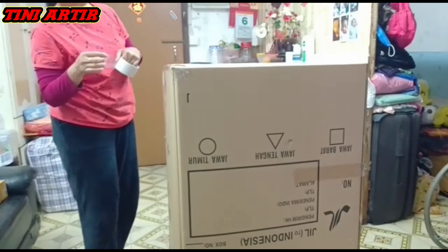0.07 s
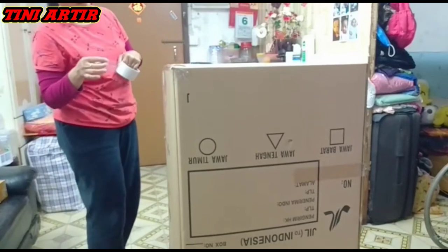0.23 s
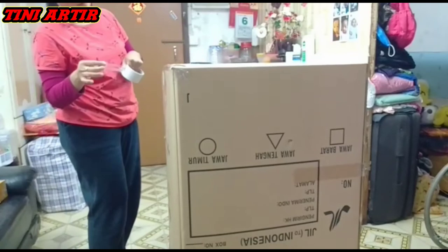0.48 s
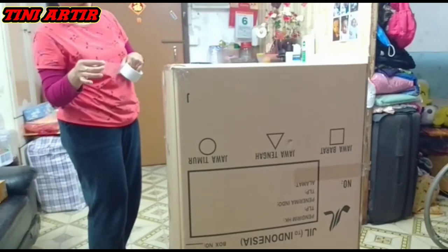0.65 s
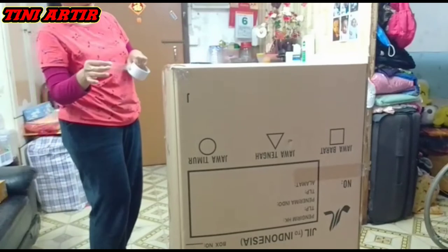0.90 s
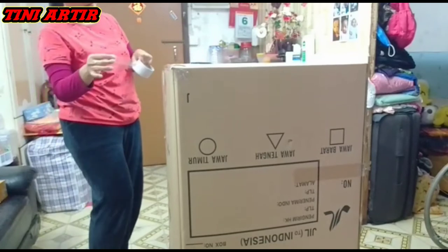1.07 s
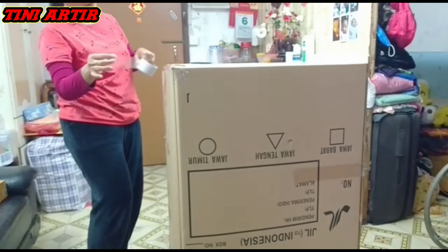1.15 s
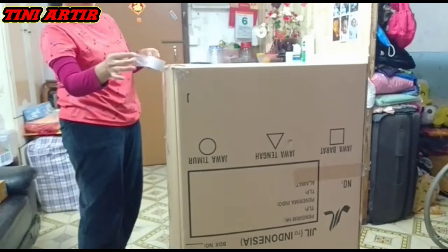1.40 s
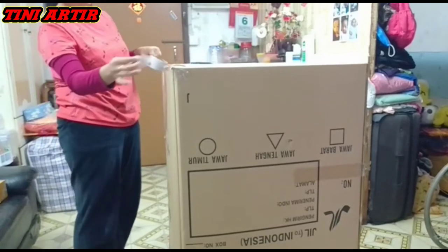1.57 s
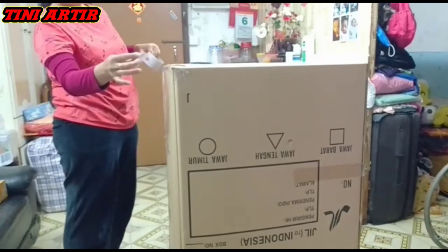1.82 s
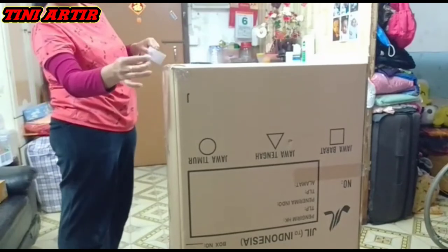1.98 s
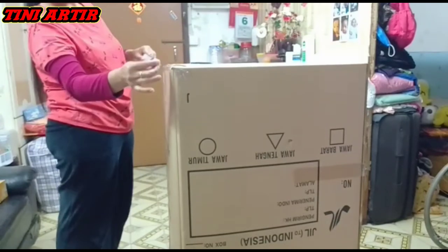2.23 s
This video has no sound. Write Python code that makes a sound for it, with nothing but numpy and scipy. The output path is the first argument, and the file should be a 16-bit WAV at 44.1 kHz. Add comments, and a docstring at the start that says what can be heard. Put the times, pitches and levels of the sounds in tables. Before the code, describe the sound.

Sticky tape is tugged off its roll in quick, crackling strokes indoors.

```python
"""Short tugs of packing tape crackle off a hand-held roll, mixed with four longer pulls.
The glue lets go in quick irregular slips; each cracks the taut film, sets it zinging,
thumps the roll and rings its cardboard core. The sound arrives from the left, glances off
nearby surfaces and fills a small, hard-walled room. Faint handling rustles and a thin hiss
of creeping tape lie over a murmur of air."""
import sys
import numpy as np
from scipy import signal
from scipy.fft import rfft, irfft, next_fast_len
from scipy.io import wavfile
from scipy.ndimage import uniform_filter1d

SR = 44100
rng = np.random.default_rng(int(sys.argv[2]) if len(sys.argv) > 2 else 0)


def dump(signal):
    """Clip the signal to [-1, 1] and save it as 16-bit WAV at the path in sys.argv[1]."""
    limited = np.clip(np.atleast_2d(signal).T, -1, 1)
    pcm = np.round(limited * 32767).astype(np.int16)
    wavfile.write(sys.argv[1], SR, pcm)


N = 99225

# Short tugs: start_s, length_s, level_db, body_db, core_db, zing_db (last three re level_db)
TUG_EVENTS = [(0.0, 0.0032, -40.5, -25, -7, -19), (0.0474, 0.015, -32, -31.5, -6, -4.5),
              (0.103, 0.0014, -33.5, -33, -17, -5.5), (0.1756, 0.0025, -35, -31, -7.5, -6),
              (0.209, 0.0076, -36.5, -25, -1.5, -6), (0.218, 0.005, -30.5, -22.5, -3.5, -2.5),
              (0.3302, 0.014, -33.5, -20.5, -5, 5.5), (0.5916, .003, -31, -26, -32, -5.5),
              (0.6606, 0.0028, -31, -32.5, -16, -3), (0.688, 0.0079, -32.5, -20, -2.5, -1),
              (0.703, 0.0074, -30.5, -17, -2, -3), (0.737, 0.016, -28, -12.5, 0.5, -6),
              (0.8334, 0.0062, -31, -15, -5, -6), (0.986, 0.0018, -29, -20, -6, 1.5),
              (1.133, .002, -36.5, -8, -11, 7), (1.5161, 0.0039, -30.5, -10.5, -13.5, -6),
              (1.65, .005, -33.5, -27.5, -6.5, 6.5), (1.891, 0.0039, -33.5, -13.5, -16, -3.5),
              (1.913, .004, -30.5, -16.5, -5.5, -2.5), (1.935, 0.0063, -32, -13.5, -16.5, 0),
              (1.955, 0.0033, -33, -19.5, -11, 8)]
TUG_GAP_S, TUG_FADE_DB, TUG_TRIM_DB = 0.0011, 8, -5
GAP_LOG_SPREAD, SLIP_SPREAD_DB, SLIP_DECAY_S = 0.45, 2.5, 0.00052
# Spectrum of the film's crack: freq_hz, gain_db
CRACK_SPECTRUM = [(100, -44.5), (350, -30), (520, -15.5), (700, -6), (1100, 0), (1500, -2.5), (2000, 3.5),
                  (2900, 2.5), (3600, -2.5), (4500, -6.5), (5600, -8), (7200, -7), (8200, -17.5),
                  (10000, -23), (12500, -31), (15000, -26.5), (16000, -25)]
# Spectrum of the roll's thump: freq_hz, gain_db
BODY_SPECTRUM = [(25, -37.5), (60, -29), (110, -12), (170, -17), (240, -11), (290, -3), (360, 1),
                 (425, -4.5), (540, 0.5), (700, -21.5), (1500, -27.5)]
# Spectrum of the taut strip's zing: freq_hz, gain_db
ZING_SPECTRUM = [(2000, -33.5), (5000, -11.5), (5900, -4.5), (6650, -0.5), (7300, -9), (8300, -19),
                 (12000, -28.5)]
CRACK_DB, BODY_DB, ZING_DB, CORE_DB = 4.5, 4, 2.5, -1
# Cardboard core modes, before the grip shifts them: pitch_hz, width_hz, level_db
CORE_MODES = [(703.6, 27, 4), (747.6, 38, -3.5), (806, 73, -9), (931, 66, -3), (983, 55, -12.5),
              (1217, 50, -17)]
# Lowest core mode as the grip changes: time_s, pitch_hz
GRIP_PITCH = [(.17, 719), (.23, 806), (.33, 725), (.41, 728.6), (1.15, 694.5), (1.52, 659), (1.65, 665)]
# Knocks on the core as the tape breaks loose: time_s, level_db
CORE_KNOCKS = [(.331, -38.5), (.593, -46), (.6595, -45), (.836, -38.5), (1.517, -31)]
CORE_CUTOFF_HZ, CORE_DIRECT_DB, CORE_ROOM_DB = 683, 4.5, -3.5  # ring sounds close and dry
DIRECT_DB, DIRECT_LEAD_S, DIRECT_PAN_DB = -9, 0.00015, 2.4
# Early reflections: delay_s, level_db, left_lead_s, left_pan_db, highpass_hz
REFLECTIONS = [(.00335, -2, 0.0054, 0, 3200), (.0042, -9.5, -.00005, 3.5, 1500),
               (.0075, -13.5, -0.017, -1.5, 400)]
# Room decay: freq_hz, t60_s
ROOM_DECAY = [(100, 0.18), (500, 0.18), (1000, 0.26), (2800, 0.26), (7000, 0.24)]
# Likeness of left and right in the room: freq_hz, correlation
ROOM_CORRELATION = [(100, 0.5), (350, 0.75), (750, 0.43), (1300, .15), (2200, 0.0098), (5000, 0.13)]
# Reverb balance: freq_hz, left_pan_db
ROOM_BALANCE = [(200, -0.6), (700, 2), (1300, 0.3), (2500, 1.2), (6000, 2), (9000, -1), (15000, -1.5)]
ROOM_DB, ROOM_DELAY_S, ROOM_BUILD_S = -5.5, 0.0044, 0.0051
MOVE_STEP_S, DELAY_LOG_SPREAD = 0.2, 0.0627
# Spectrum of the room's air: freq_hz, gain_db
AIR_SPECTRUM = [(25, -1.5), (80, -2.5), (120, 1.5), (200, -7), (1500, -13.5), (4000, -17), (6500, -11),
                (9000, -26), (16000, -36.5)]
AIR_DB, LOWPASS_HZ = -77, 15750
# Long pulls, one list each: time_s, level_db, body_db, core_db, zing_db (last three re level_db)
PULL_ENVELOPES = [
    [(.332, -35, -16.5, 4.5, -8.5), (.355, -33.5, -14, -0.5, -5), (.378, -33, -12, 6.5, 2.5),
     (.412, -31, -18.5, 6, -4.5), (.44, -34.5, -10, -10, -4.5)],
    [(.836, -33, -13, -2, 3.5), (.86, -28, -8.5, -1.5, -9), (.898, -29, -16, -0.5, -2),
     (.955, -31.5, -11.5, -3, -14), (.975, -45.5, -15, -12, -17.5), (1.055, -39, -10.5, 0.5, -3.5),
     (1.08, -34.5, -13.5, -5, 0.5), (1.135, -39, -13.5, 0.5, -3.5), (1.178, -39, -9.5, -12, -8.5)],
    [(1.517, -30.5, -15, -9.5, -9), (1.545, -33.5, -9, -5, -5.5), (1.6, -34.5, -10.5, -6, 0.5),
     (1.632, -34, -10.5, -1.5, -8), (1.657, -48, -12, -11.5, -9)],
    [(1.892, -42, -1, -3.5, -6), (1.908, -42, -19.5, 1, -2.5), (1.955, -44.5, -14, -3.5, 0),
     (1.98, -49, -9.5, -5.5, -6)],
]
PULL_SLIPS_PER_S, PULL_ATTACK_S, PULL_RELEASE_S = 480, 0.00089, 0.0039
# Handling rustles and (second row) tape creep: start_s, length_s, level_db, centre_hz, width_oct
RUSTLES_AND_CREEP = [(1.293, 0.1, -68.5, 2340, 0.42), (1.416, 0.13, -80, 6530, 0.14),
                     (2.149, 0.075, -72, 725, 0.61)]
GRAIN_DB = 2


def amp(db):
    """Decibels to gain."""
    return 10 ** (np.asarray(db) / 20)


def unit_rms(x):
    """Scale to rms 1."""
    return x / np.sqrt(np.mean(np.abs(x) ** 2) + 1e-20)


def curve_at(points, hz):
    """Interpolate (freq_hz, value) points on a log axis."""
    point_hz, values = np.transpose(points)
    return np.interp(np.log(hz + 1), np.log(point_hz + 1), values)


def grid_hz():
    """Filter frequency grid."""
    return np.fft.rfftfreq(2 * next_fast_len(N), 1 / SR)


def filtered(x, response):
    """Apply a response given on the grid."""
    return irfft(rfft(x, 2 * next_fast_len(N)) * response)[..., :N]


def minimum_phase(spectrum):
    """Unit-power response that rings only after the blow."""
    cepstrum = irfft(np.log(amp(curve_at(spectrum, grid_hz()))))
    half = len(cepstrum) // 2
    cepstrum[1:half] *= 2
    cepstrum[half + 1:] = 0
    return unit_rms(np.exp(rfft(cepstrum)))


def tugs():
    """Each tug spreads its energy over a fading run of slips. Rows: crack, body, core, zing."""
    drive = np.zeros((4, N))
    for start_s, length_s, level_db, *parts_db in TUG_EVENTS:
        gap_draw, size_draw = rng.standard_normal((32, 2)).T
        gaps_s = TUG_GAP_S * np.exp(GAP_LOG_SPREAD * gap_draw)
        age_s = np.cumsum(gaps_s) - gaps_s[0]
        fade_db = TUG_FADE_DB * np.minimum(age_s / length_s, 1)
        sizes = (age_s <= length_s) * amp(SLIP_SPREAD_DB * size_draw - fade_db)
        sizes *= np.sqrt(SR / 100) / np.linalg.norm(sizes)  # energy of 10 ms at rms 1
        train = np.bincount(((start_s + age_s) * SR).astype(int), sizes, N)[:N]
        drive += amp(TUG_TRIM_DB + level_db + np.array([0, *parts_db]))[:, None] * train
    return drive


def glue_slips(drive):
    """Each slip is a tiny noise burst of snapping glue threads."""
    pole = np.exp(-1 / (SLIP_DECAY_S * SR))
    power = signal.lfilter([1 - pole], [1, -pole], drive ** 2)
    return np.sqrt(power) * np.sign(rng.standard_normal((4, N)))


def film_crackle(crack, body, zing):
    """Slips crack the film, thump the roll and set the taut strip zinging."""
    return (amp(CRACK_DB) * filtered(crack, minimum_phase(CRACK_SPECTRUM))
            + amp(BODY_DB) * filtered(body, minimum_phase(BODY_SPECTRUM))
            + amp(ZING_DB) * filtered(zing, minimum_phase(ZING_SPECTRUM)))


def core_ring(slips):
    """Slips and knocks ring the cardboard core; its modes shift together with the grip."""
    t, hz = np.arange(N) / SR, grid_hz()
    knock_s, knock_db = np.transpose(CORE_KNOCKS)
    drive = slips + np.bincount((knock_s * SR).astype(int), amp(knock_db), N) * np.sqrt(SR / 100)
    lowest_hz = np.interp(t, *np.transpose(GRIP_PITCH))
    warped_s = np.cumsum(lowest_hz) / CORE_MODES[0][0] / SR
    ring, power = 0, 0
    for pitch_hz, width_hz, level_db in CORE_MODES:
        phasor = np.exp(2j * np.pi * pitch_hz * warped_s)
        pole = np.exp(-np.pi * width_hz / SR)
        envelope = signal.lfilter([1 - pole], [1, -pole], drive / phasor)
        ring += amp(level_db) * (phasor * envelope).real
        power += amp(level_db) ** 2 * (1 - pole) / (1 + pole) / 2
    # A small core radiates little bass.
    radiation = (hz ** 2 / (CORE_CUTOFF_HZ ** 2 - hz ** 2 + 1j * hz * CORE_CUTOFF_HZ)) ** 2
    return amp(CORE_DB) * filtered(ring / np.sqrt(power), radiation)


def sound_path(hz, delay_s, level_db, lead_s, pan_db):
    """Stereo response of one path; positive lead and pan favour the left."""
    side = np.array([[1], [-1]])
    return amp(level_db + side * pan_db) * np.exp(-2j * np.pi * hz * (delay_s - side * lead_s / 2))


def diffuse(spectra, hz):
    """Mix two unrelated spectra into a room field: alike in the bass, barely so in the treble."""
    angle_rad = np.arccos(curve_at(ROOM_CORRELATION, hz)) / 2
    mid, side = spectra * np.array([np.cos(angle_rad), np.sin(angle_rad)])
    return np.array([mid + side, mid - side])


def echoes():
    """Room impulse response for one roll position: glancing reflections, then a short reverb."""
    band_hz, frame_s, noise = signal.stft(rng.standard_normal((2, SR // 2)), SR, nperseg=256)
    decay = amp(-60 * frame_s / curve_at(ROOM_DECAY, band_hz)[:, None])
    _, tail = signal.istft(noise * decay, SR, nperseg=256)
    age_s = np.maximum(np.arange(tail.shape[1]) / SR - ROOM_DELAY_S, 0)
    tail *= 1 - np.exp(-age_s / ROOM_BUILD_S)
    hz = np.fft.rfftfreq(tail.shape[1], 1 / SR)
    response = diffuse(rfft(tail / np.linalg.norm(tail[0])), hz)
    response *= sound_path(hz, 0, ROOM_DB, 0, curve_at(ROOM_BALANCE, hz))
    for delay_s, level_db, lead_s, pan_db, highpass_hz in REFLECTIONS:
        drift = np.exp(DELAY_LOG_SPREAD * rng.standard_normal())
        highpass = 1j * hz / (highpass_hz + 1j * hz)
        response += sound_path(hz, delay_s * drift, level_db, lead_s, pan_db) * highpass
    return irfft(response)[:, :SR // 3]


def room(direct, send):
    """Direct sound from the left, plus echoes redrawn each step as the hands move."""
    path = sound_path(grid_hz(), 0, DIRECT_DB, DIRECT_LEAD_S, DIRECT_PAN_DB)
    out = np.pad(filtered(direct, path), ((0, 0), (0, SR)))
    step = int(MOVE_STEP_S * SR)
    for start in range(0, N, step):
        wet = signal.fftconvolve(send[None, start:start + step], echoes(), axes=1)
        out[:, start:start + wet.shape[1]] += wet
    return out[:, :N]


def air():
    """Steady murmur of air in the quiet room."""
    colour = amp(curve_at(AIR_SPECTRUM, grid_hz()))
    return amp(AIR_DB) * unit_rms(filtered(rng.standard_normal((2, N)), colour))


def pulls():
    """Glue sticks and slips densely through each long pull. Rows: crack, body, core, zing."""
    gap_draw, size_draw = rng.standard_normal((4000, 2)).T
    gaps = np.exp(GAP_LOG_SPREAD * gap_draw)
    gaps_s = gaps / gaps.mean() / PULL_SLIPS_PER_S
    onsets = (np.cumsum(gaps_s) * SR).astype(int)
    sizes = np.sqrt(gaps_s) * amp(SLIP_SPREAD_DB * size_draw)  # longer stick, bigger slip
    train = unit_rms(np.bincount(onsets[onsets < N], sizes[onsets < N], N))
    t, drive = np.arange(N) / SR, np.zeros((4, N))
    for pull in PULL_ENVELOPES:
        time_s, *columns = np.transpose(pull)
        level_db, *parts_db = [np.interp(t, time_s, column) for column in columns]
        attack = np.clip((t - time_s[0]) / PULL_ATTACK_S + 1, 0, 1)
        release = np.exp(-np.maximum(t - time_s[-1], 0) / PULL_RELEASE_S)
        drive += train * attack * release * amp(level_db + np.array([np.zeros(N), *parts_db]))
    return drive


def rustles_and_creep():
    """Faint handling rustles and a thin hiss of creeping tape: swells of grainy noise."""
    t, out = np.arange(N) / SR, np.zeros((2, N))
    for start_s, length_s, level_db, centre_hz, width_oct in RUSTLES_AND_CREEP:
        grain = amp(GRAIN_DB * unit_rms(uniform_filter1d(rng.standard_normal(N), size=120)))
        offset_oct = np.log2((grid_hz() + 1) / centre_hz)
        band = 1 / (1 + (offset_oct / width_oct) ** 2 / 2) ** 2
        progress = np.clip((t - start_s) / length_s, 0, 1)
        swell = np.sqrt(np.abs(np.sin(np.pi * progress)))
        out += amp(level_db) * swell * unit_rms(filtered(grain * rng.standard_normal((2, N)), band))
    return out


def scene():
    """Tape peeling in the room, over faint handling, tape creep and air."""
    crack, body, core, zing = glue_slips(pulls() + tugs())
    film = film_crackle(crack, body, zing)
    ring = core_ring(core)
    peel = room(direct=film + amp(CORE_DIRECT_DB) * ring, send=film + amp(CORE_ROOM_DB) * ring)
    background = diffuse(rfft(rustles_and_creep() + air()), np.fft.rfftfreq(N, 1 / SR))
    return peel + irfft(background, N)


def record(dry):
    """Steep low-pass."""
    return filtered(dry, 1 / np.sqrt(1 + (grid_hz() / LOWPASS_HZ) ** 160))


dry = scene()
out = record(dry)
dump(out)
```